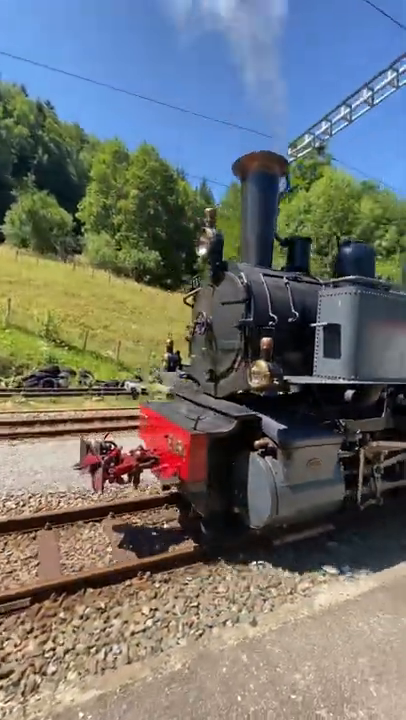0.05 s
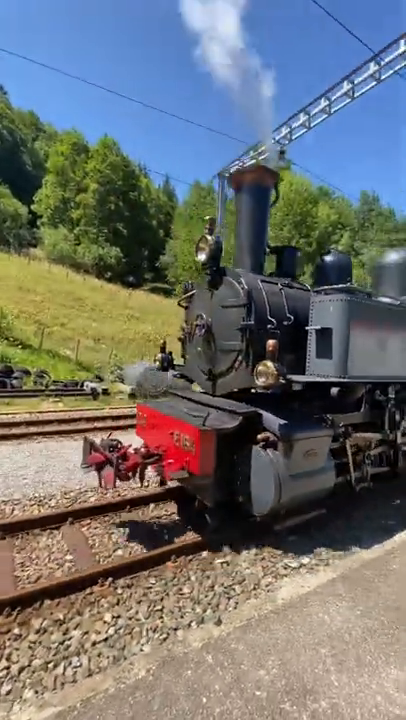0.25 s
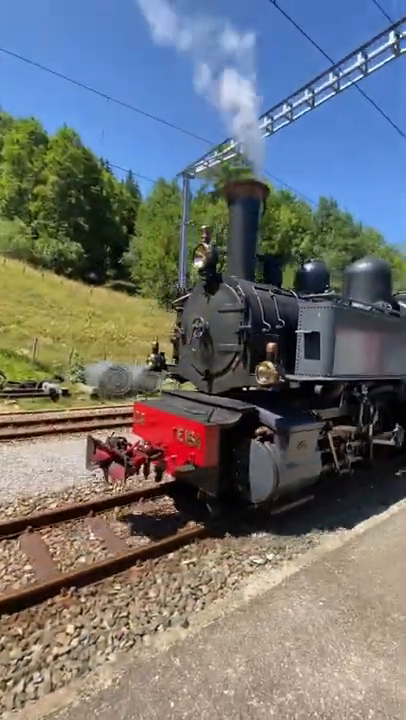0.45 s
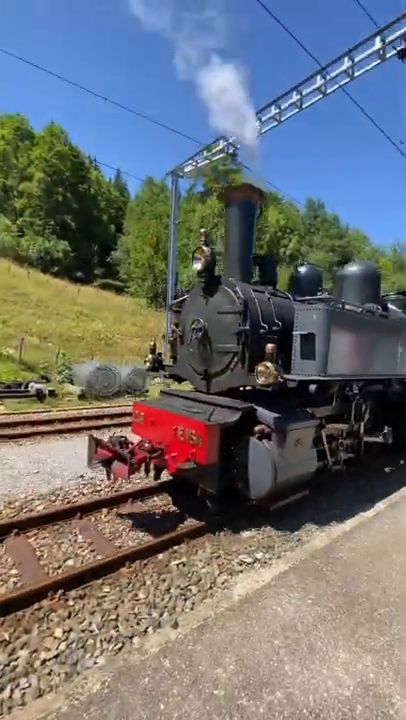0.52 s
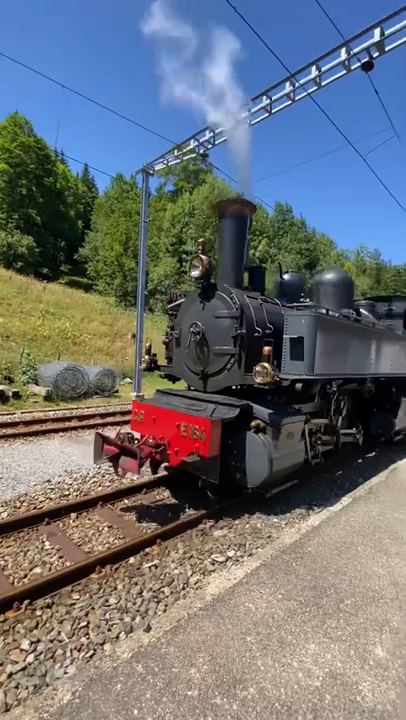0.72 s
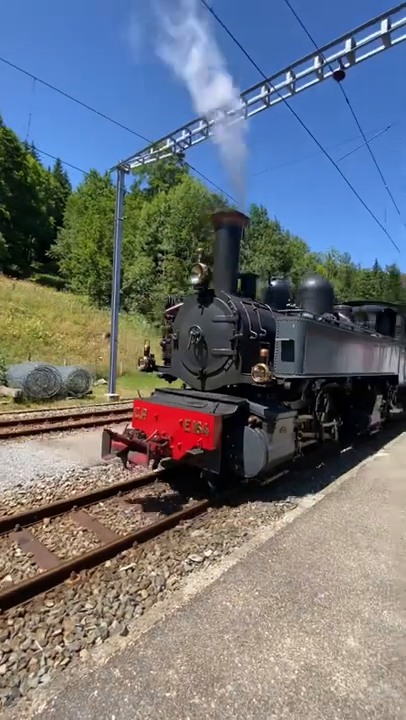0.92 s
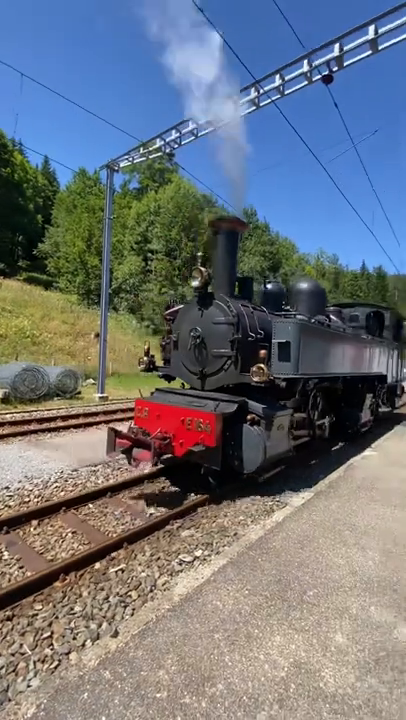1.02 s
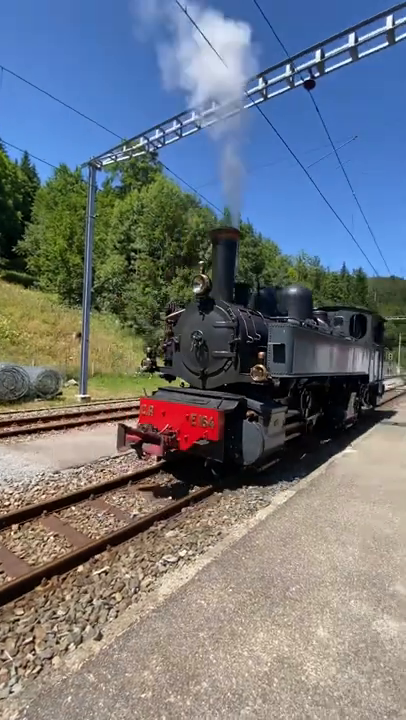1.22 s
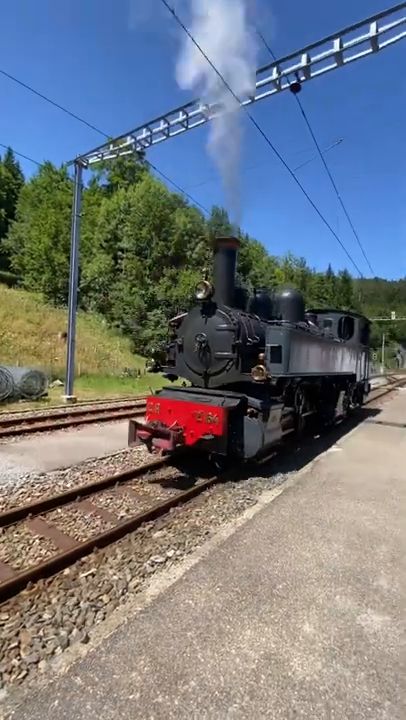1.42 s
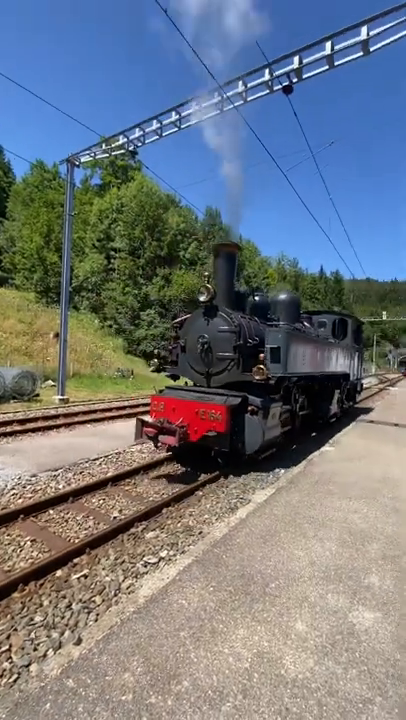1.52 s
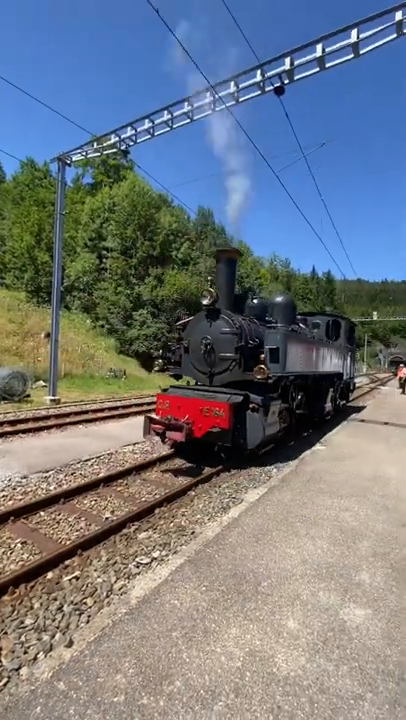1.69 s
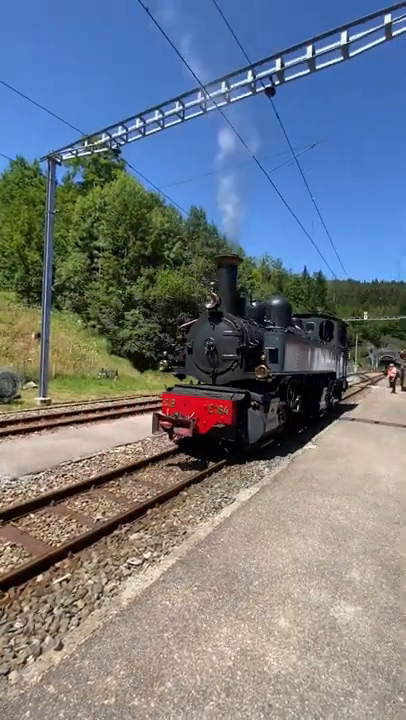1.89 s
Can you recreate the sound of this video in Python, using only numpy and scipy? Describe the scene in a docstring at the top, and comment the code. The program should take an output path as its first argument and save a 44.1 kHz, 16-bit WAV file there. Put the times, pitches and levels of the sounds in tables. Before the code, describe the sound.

Steam locomotive hissing at an outdoor platform, with a wavering hollow leak whistle and two steam puffs

```python
"""Steam hisses over a low running rumble: a steam locomotive stands at an open-air platform.
Leaking steam sings with a sputtering, hollow whistle, a wavering tone in a band of noise.
Soft chuffs sound behind; two puffs, bursts of resonant noise, break out as the whistle's pitch swings.
The hiss fades as the listener walks away with a pair of closely spaced microphones."""
import sys
import numpy as np
from scipy import signal
from scipy.fft import rfft, irfft
from scipy.io import wavfile

SR = 44100
rng = np.random.default_rng(int(sys.argv[2]) if len(sys.argv) > 2 else 0)


def inscribe(sig):
    """Save sig as 16-bit PCM at rate SR to the path in sys.argv[1].

    A 1-D sig is mono; a 2-D sig holds one channel per row.
    Samples are clipped to [-1, 1] before scaling.
    """
    pcm = np.round(np.clip(np.atleast_2d(sig).T, -1, 1) * 32767)
    wavfile.write(sys.argv[1], SR, pcm.astype(np.int16))


N = 85995
T, HZ = np.arange(N) / SR, np.fft.rfftfreq(N, 1 / SR)


def amp(db):
    """Decibels to gain."""
    return 10 ** (np.asarray(db) / 20)


def unit(x):
    """Scales to rms 1."""
    return x / np.sqrt(np.mean(x ** 2) + 1e-20)


def over_time(points):
    """Joins (s, value) points with straight lines."""
    return np.interp(T, *np.transpose(points))


def over_hz(points, axis=1):
    """Reads one column of a table on a log-frequency axis."""
    table = np.transpose(points)
    return np.interp(np.log(HZ + 1), np.log(table[0] + 1), table[axis])


def noise(gain):
    """Two unrelated noises with the given spectrum, rms 1 over both."""
    white = rng.standard_normal((2, N))
    return unit(irfft(rfft(white) * gain, N))


def wander(rate_hz):
    """Random motion of rms 1: noise under a Gaussian low-pass, without its mean."""
    low_pass = np.exp(-(HZ / rate_hz) ** 2) * (HZ > 0)
    return unit(irfft(rfft(rng.standard_normal(N)) * low_pass, N))


def sputter(depth_db, rate_hz):
    """Random gain of rms 1 that wanders in dB."""
    return unit(amp(depth_db * wander(rate_hz)))


def resonance(hz, width_hz):
    """Gain of a steep-sided resonance, halved at half the width either side."""
    return 1 / (1 + (2 * (HZ - hz) / width_hz) ** 2)


def drifting(x, shift_hz):
    """Slides a band of noise up and down by a curve in Hz."""
    turns = np.cumsum(shift_hz) / SR
    return (signal.hilbert(x) * np.exp(2j * np.pi * turns)).real


def burst(start_s, rise_s, length_s, release_s):
    """Envelope: smooth rise, hold until length_s after the start, exponential release."""
    t = T - start_s
    rise = np.sin(np.pi / 2 * np.clip(t / rise_s, 0, 1)) ** 2
    return rise * np.exp(-np.maximum(t - length_s, 0) / release_s)


def jet():
    """Broadband noise of escaping steam; its treble fizz has a level and flicker of its own."""
    # Each row: frequency in Hz, relative level per hertz in dB.
    colour = [(400, -6), (750, -3), (1500, -1.5), (2250, -2), (3000, -6), (3600, -4.5), (4700, -2.5),
              (5600, -2), (6700, -1), (7300, 3.5), (8000, -3.5), (8400, -2.5), (9900, -9), (11900, -1),
              (13500, -13), (15500, -4)]
    # Each row: time in s, treble level relative to the rest in dB.
    treble_level = [(0, 0), (.3, 3.5), (.8, 5), (1.0, 3), (1.2, -1), (1.95, 2)]
    treble_above_hz = 7800
    treble = 1 / (1 + (treble_above_hz / (HZ + 1)) ** 10)
    steam = noise(amp(over_hz(colour))) * sputter(depth_db=0.85, rate_hz=420)
    fizz = irfft(rfft(steam) * treble, N)
    rest = steam - fizz
    return rest + fizz * amp(over_time(treble_level)) * sputter(depth_db=0.43, rate_hz=52)


def leak_ring():
    """Resonances of the leak: noise bands drifting together, swelling singly, fading with distance."""
    # Each row: frequency in Hz, width in Hz, level relative to the jet in dB.
    modes = [(1987, 89, -9.5), (2688, 120, -13), (3303, 96, -15.5), (3978, 66, -11), (4134, 106, -12),
             (5670, 100, -18), (6090, 43, -16.5), (7600, 93, -10)]
    drift_rms_hz, fade_start_s, fade_db_per_s = 23.4, 1, -6.5
    drift_hz = drift_rms_hz * wander(rate_hz=4.93)
    ring = 0
    for hz, width_hz, db in modes:
        band = drifting(noise(resonance(hz, width_hz)), drift_hz)
        ring = ring + amp(db) * band * sputter(depth_db=2.5, rate_hz=20.4)
    return ring * amp(fade_db_per_s * np.maximum(T - fade_start_s, 0))


def hiss():
    """The steady jet and the leak's resonances under one level curve."""
    # Each row: time in s, level in dB.
    level = [(0, -34.5), (.25, -30.5), (.85, -30.5), (1.0, -30.5), (1.17, -37), (1.45, -34.5), (1.95, -35)]
    return amp(over_time(level)) * (jet() + leak_ring()) * sputter(depth_db=0.5, rate_hz=31)


def rumble():
    """Low, uneven noise roar of the fire and draught, slowly receding."""
    # Each row: frequency in Hz, relative level per hertz in dB.
    colour = [(20, -36), (35, -9), (60, 2), (100, -2), (170, -3.5), (280, -1.5), (390, -5), (470, -14.5),
              (720, -2.5), (1000, -22), (3000, -18), (12000, -41)]
    start_db, db_per_s = -37.5, -0.83
    roar = noise(amp(over_hz(colour))) * sputter(depth_db=1.6, rate_hz=11)
    return amp(start_db + db_per_s * T) * roar


def whistle(waver_hz=7, waver_rate_hz=35, loud_db=-28):
    """A wavering tone in a breathy band of noise; the harder it blows, the purer it is."""
    # Each row: time in s, strength in dB.
    strength = [(0, -39), (.04, -48), (.11, -32), (.22, -34.5), (.254, -28), (.304, -29.5), (.33, -20),
                (.365, -42), (.415, -25.5), (.48, -27.5), (.605, -36.5), (.64, -21.5), (.688, -25),
                (.716, -41.5), (.77, -20.5), (.8, -30), (.858, -14.5), (.906, -25.5), (.95, -23.5),
                (.975, -31.5), (1.025, -30.5), (1.05, -15), (1.074, -13.5), (1.096, -11), (1.115, -21),
                (1.172, -44), (1.216, -21.5), (1.285, -35), (1.308, -21.5), (1.378, -41.5), (1.48, -30.5),
                (1.7, -49.5), (1.95, -58)]
    # Each row: time in s, pitch in Hz before the waver.
    pitch = [(0, 1131), (.12, 1150), (.26, 1128), (.45, 1130), (.52, 1175), (.62, 1128), (.87, 1130),
             (.93, 1160), (.99, 1110), (1.03, 1175), (1.047, 1285), (1.068, 1156), (1.11, 1134),
             (1.22, 1128), (1.32, 1073), (1.39, 1129), (1.5, 1160), (1.62, 1106), (1.95, 1142)]
    tone_db, fuzz_db = -0.5, -4  # re strength; fuzz_db holds at strength loud_db
    fuzz_hz, fuzz_width_hz, fuzz_follow_db_per_db = 1126, 95, 0.32
    level_db = over_time(strength)
    turns = np.cumsum(over_time(pitch) + waver_hz * wander(waver_rate_hz)) / SR
    tone = amp(level_db + tone_db) * unit(np.sin(2 * np.pi * turns)) * sputter(depth_db=2.33, rate_hz=87)
    fuzz_level_db = loud_db + fuzz_db + fuzz_follow_db_per_db * (level_db - loud_db)
    fuzz = amp(fuzz_level_db) * noise(resonance(fuzz_hz, fuzz_width_hz))
    return np.array([tone, np.zeros(N)]) + fuzz  # the tone is all direct sound


def chuffs():
    """Short, dull gasps of steam: enveloped noise."""
    # Each row: start in s, length before release in s, level in dB.
    gasps = [(0.035, 0.04, -36), (0.191, 0.055, -32.5), (0.386, 0.031, -36), (0.758, 0.094, -37.5),
             (1.193, 0.021, -31.5), (1.552, 0.046, -36.5), (1.64, 0.052, -35)]
    # Each row: frequency in Hz, relative level per hertz in dB.
    colour = [(100, -32), (280, -12), (480, -6.5), (750, 4), (1000, 0), (1600, -16.5), (4000, -25.5),
              (12000, -19)]
    rise_s, release_s = 0.0033, 0.021
    level = sum(amp(db) * burst(start_s, rise_s, length_s, release_s) for start_s, length_s, db in gasps)
    return level * noise(amp(over_hz(colour)))


def puffs():
    """Bursts of steam with fixed peaks in their colour; they sag as the pressure drops."""
    # Each row: start in s, rise in s, length before release in s, release in s, level in dB,
    # sag after the rise in dB per s.
    bursts = [(1.024, 0.03, 0.12, 0.028, -15.5, -115), (1.164, 0.046, 0.092, 0.12, -23.5, -5.5)]
    # Each row: frequency in Hz, relative level per hertz in dB.
    colour = [(100, -28), (240, -1.5), (420, -5), (900, 0), (1500, -2.5), (2150, 0), (3800, -2), (5300, -3),
              (7200, -3), (9500, -8.5), (13000, -14), (15500, -39)]
    # Fixed peaks in the colour of the bursts. Each row: frequency in Hz, width in Hz, level relative to the
    # steam in dB.
    modes = [(1253, 180, -7), (1805, 99, -11.5), (2163, 290, -11), (2780, 170, -9), (3293, 120, -12),
             (4370, 170, -15.5), (5140, 340, -12), (5550, 120, -11), (6320, 130, -16), (6550, 130, -30)]
    level = 0
    for start_s, rise_s, length_s, release_s, db, sag_db_per_s in bursts:
        sag_db = sag_db_per_s * np.maximum(T - start_s - rise_s, 0)
        level = level + burst(start_s, rise_s, length_s, release_s) * amp(db + sag_db)
    steam = noise(amp(over_hz(colour)))
    ring = sum(amp(db) * noise(resonance(hz, width_hz)) for hz, width_hz, db in modes)
    return level * unit(steam + ring)


def microphone_pair(direct, diffuse):
    """Spaced microphones: phase, likeness and balance between them depend on frequency."""
    # Each row: frequency in Hz, likeness from 0 to 1, left minus right in dB.
    pair = [(20, .99, 1.5), (169, 1, -0.5), (360, 1, 4), (610, 0.4, -7.5), (930, 0.39, 5.5),
            (1230, 0.95, 2.5), (1460, 0.12, -0.5), (1730, 0.65, 3.5), (2120, 0.3, -5.5), (2500, 0.39, -1),
            (3440, 0.34, 0), (4200, 0.71, 0), (5300, 0.8, 0), (7500, 0.65, -2), (9200, 0.82, 1.5),
            (10100, 1, -1), (14900, 0.92, 0.5)]
    # Each row: frequency in Hz, lead of the left in radians.
    pair_lead = [(60, 0), (170, -.12), (350, -.7), (590, -3.4), (900, -8), (1100, -10.9), (1200, -11.4),
                 (1400, -12.9), (1750, -12.3), (2050, -12.5), (2500, -15.1), (3500, -15.8), (4000, -16.9),
                 (4600, -16.9), (5300, -18.7), (6300, -17.6), (7500, -15.8), (9000, -14.4), (10300, -12.6),
                 (12000, -10.9), (13000, -9.6), (15000, -9.4)]
    likeness = np.clip(over_hz(pair), 0, 1)
    balance = amp(over_hz(pair, axis=2))
    right = likeness * direct + np.sqrt(1 - likeness ** 2) * diffuse
    right = right * np.exp(-1j * over_hz(pair_lead))
    return np.array([direct * balance, right]) * np.sqrt(2 / (1 + balance ** 2))


def scene():
    """All sources summed as direct and diffuse sound, then heard by the microphone pair."""
    direct, diffuse = rfft(hiss() + rumble() + whistle() + chuffs() + puffs())
    return irfft(microphone_pair(direct, diffuse), N)


def record(dry):
    """The recorder's low cut and band limit."""
    low_cut_hz, edge_hz = 29, 15750
    low_cut = signal.butter(4, low_cut_hz, "highpass", fs=SR, output="sos")
    band_limit = signal.firwin(511, edge_hz, window=("kaiser", 9), fs=SR)
    return signal.oaconvolve(signal.sosfilt(low_cut, dry), band_limit[None], "same")


dry = scene()
out = record(dry)
inscribe(out)
```